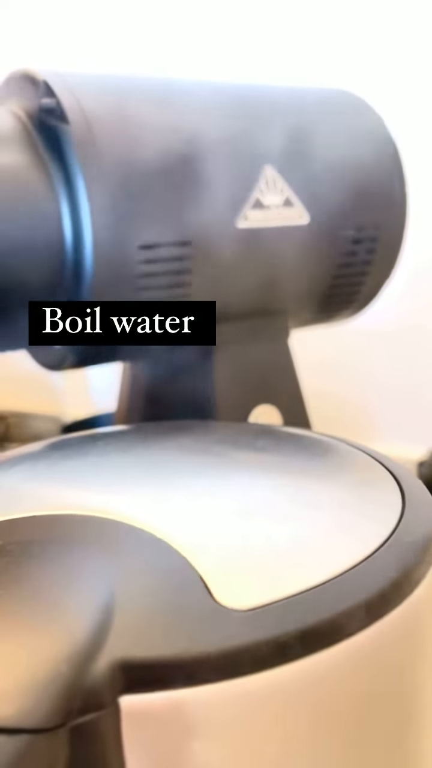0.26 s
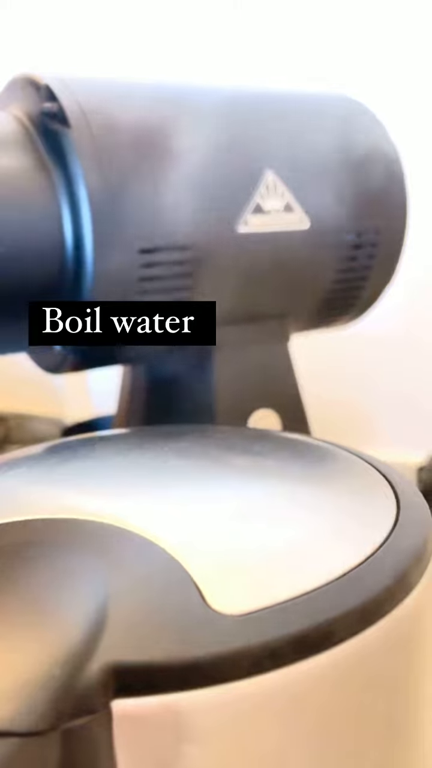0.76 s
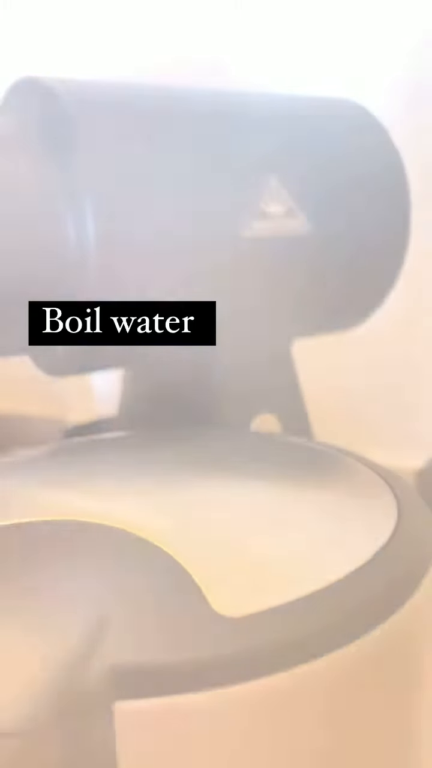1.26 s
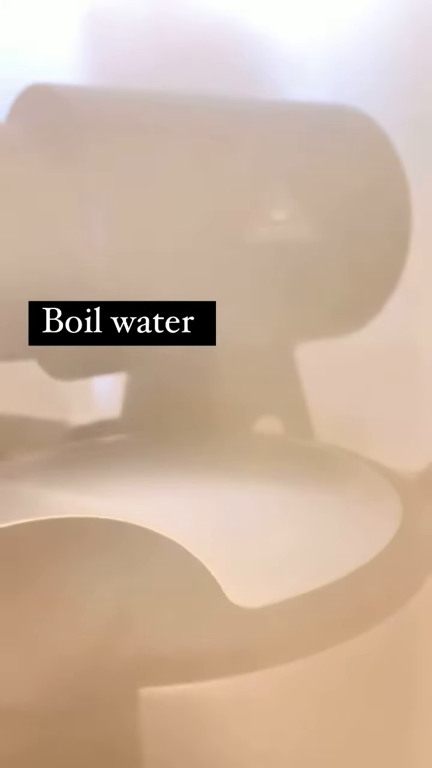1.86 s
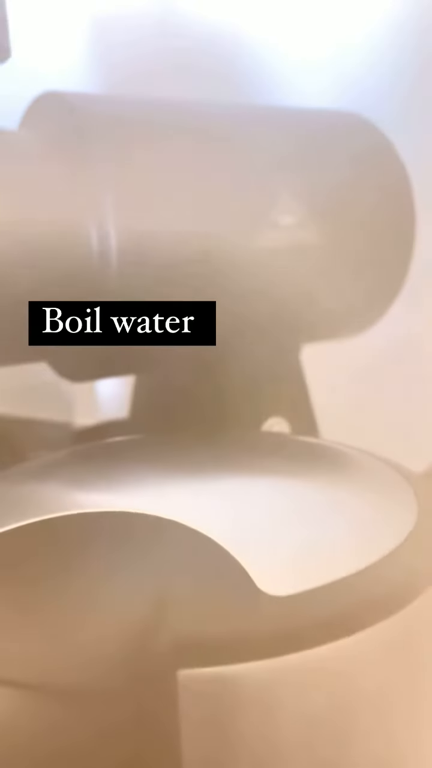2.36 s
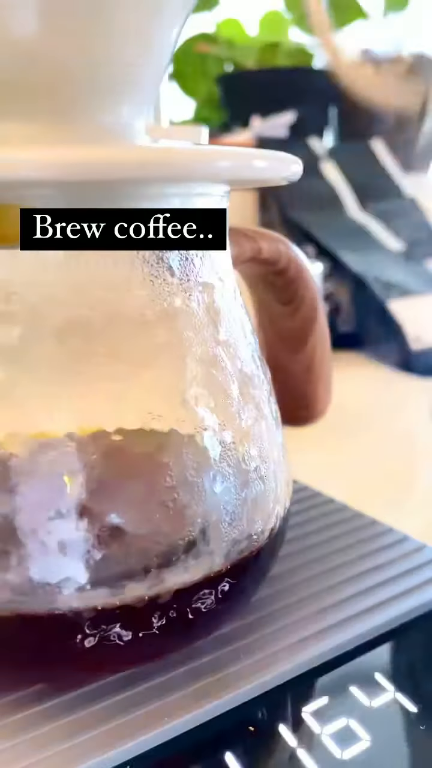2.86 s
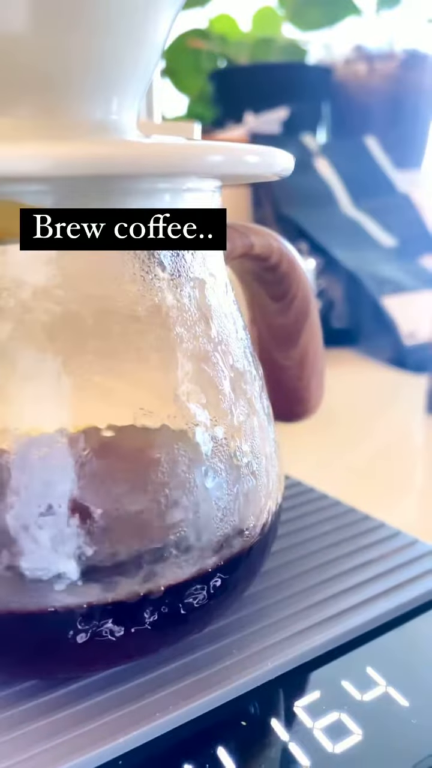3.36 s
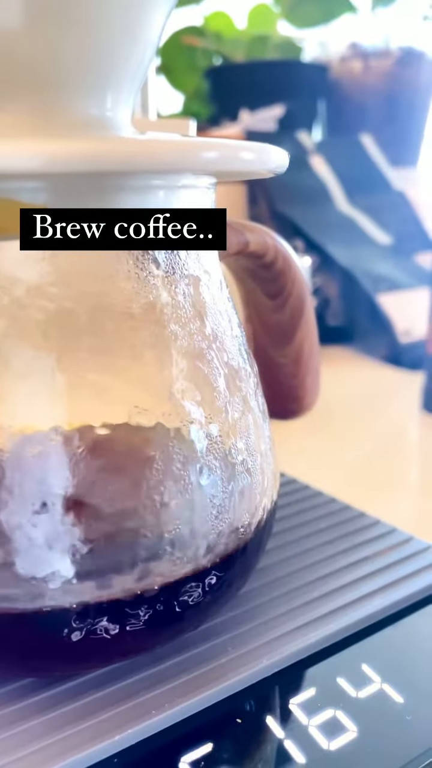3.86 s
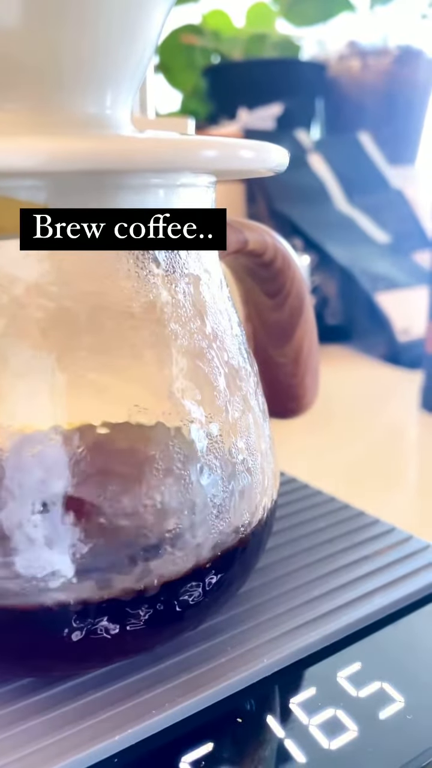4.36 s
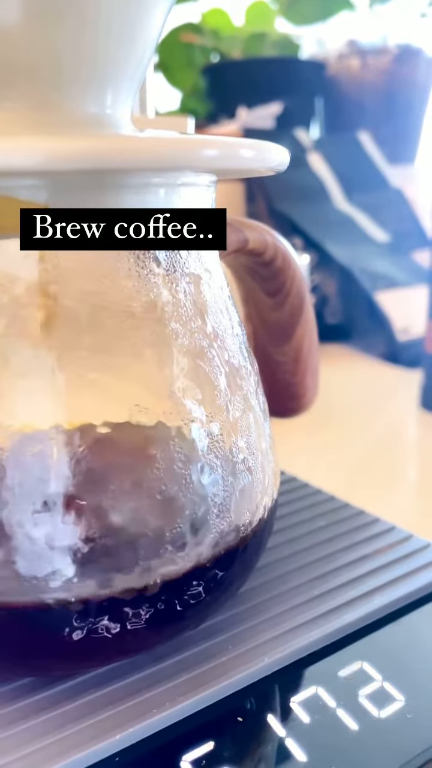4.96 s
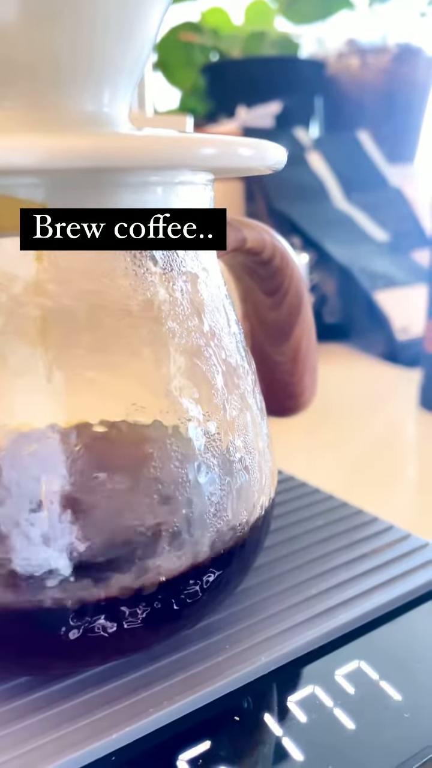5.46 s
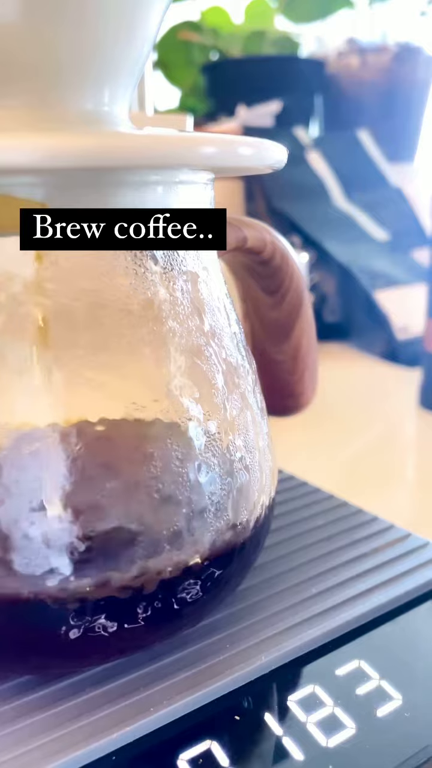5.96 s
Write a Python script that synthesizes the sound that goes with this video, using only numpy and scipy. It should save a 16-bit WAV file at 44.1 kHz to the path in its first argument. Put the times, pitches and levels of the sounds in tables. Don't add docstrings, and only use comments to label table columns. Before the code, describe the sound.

Loud bubbling rumble of boiling water stops dead at about three seconds; soft ventilation hum, faint rustles and delicate drops on glass follow.

```python
import sys
import numpy as np
from scipy import signal
from scipy.fft import rfft, irfft
from scipy.io import wavfile
from scipy.ndimage import uniform_filter1d

SR = 44100
rng = np.random.default_rng(int(sys.argv[2]) if len(sys.argv) > 2 else 0)


def amplitude_ratio(level_db):
    exponent = np.asarray(level_db, float) / 20
    return 10 ** exponent


def int16_out(signal):
    q = np.round(np.clip(np.atleast_2d(signal).T, -1, 1) * 32767)
    wavfile.write(sys.argv[1], SR, q.astype(np.int16))


N = 273420
T = np.arange(N) / SR
HZ = np.fft.rfftfreq(N, 1 / SR)

# [from_s, to_s, edge_s]
GAPS = [
    (2.8776, 2.92555, .00004),
    (3.90207, 3.92683, .00009),
]
# [start_s, peak_db, pitch_hz]
SPITS = [(0.0416, -36.5, 5600), (0.168, -39.5, 5420), (0.188, -33, 5360), (0.2403, -32.5, 3700),
         (0.284, -38, 4320), (0.3062, -53, 4640), (0.3336, -33.5, 3700), (0.3923, -43.5, 3740),
         (0.409, -43.5, 5350), (0.4262, -33, 5500), (0.4804, -46, 3700), (0.5205, -30, 5200),
         (0.6233, -47.5, 4840), (0.6583, -44, 4700), (0.704, -48.5, 3780), (0.7303, -39, 5000),
         (0.7721, -35, 4360), (0.794, -42.5, 4800), (0.815, -42, 4680), (0.837, -39.5, 3650),
         (0.893, -37.5, 3700), (0.9408, -37, 4520), (0.991, -35, 4120), (1.0614, -42.5, 3230),
         (1.0597, -40.5, 4510), (1.1346, -34.5, 3580), (1.1807, -39.5, 4600), (1.2092, -45, 4550),
         (1.285, -38.5, 4080), (1.376, -38, 4640), (1.498, -33.5, 4760), (1.5525, -34, 3780),
         (1.57, -35, 5060), (1.6195, -45.5, 5330), (1.6496, -36, 4860), (1.674, -47, 3660),
         (1.7102, -37.5, 4400), (1.7522, -37.5, 5260), (1.8, -35, 4500), (1.878, -33, 5040),
         (1.924, -33.5, 5360), (1.9547, -34.5, 5150), (2.0135, -42.5, 5210), (2.049, -39, 3540),
         (2.0838, -34, 5350), (2.136, -38, 4470), (2.157, -47, 4600), (2.1718, -34, 4700),
         (2.279, -37, 5130), (2.301, -37.5, 5100), (2.3577, -42.5, 5170), (2.384, -48, 4080),
         (2.595, -37.5, 3150), (2.633, -37.5, 3270), (2.6586, -38, 3730), (2.6958, -29.5, 3650),
         (2.7638, -33.5, 3320), (2.869, -28, 4940)]


def boil():
    deep, drum, hiss = vigour()
    surge = bursts(per_s=90, spread_db=1.5, decay_s=.005, steady=1.6)
    steady = roar(deep, drum, surge) + fizz(hiss, surge)
    growth_db = 3 * np.clip((T - 2.5) / 0.18, 0, 1)
    light = amplitude_ratio(-0.93 + growth_db) * hiss * bubbles(per_s=260, lo_hz=872, hi_hz=3060, cycles=12.7)
    light = light + lid_bursts()
    for at, db, hz in SPITS:
        add(light, at, amplitude_ratio(db - 0.5) * ping(hz, 0.0047, 0.0004))
    return steady + scattered(light, t60=0.052, wet_db=-.8) + scattered(heavy_water(), t60=.03, wet_db=-8)


def vigour():
    # [time_s, vigour_db]
    course = [
        (0.0, -27.5),
        (0.03, -33.5),
        (0.1, -30),
        (1.55, -28.5),
        (1.66, -33.5),
        (1.74, -29),
        (2.69, -29),
        (2.709, -29.5),
        (2.87, -31.5),
    ]
    s, db = np.transpose(course)
    db = np.interp(T, s, db - db.mean())
    mean_db, db_per_db = np.c_[[-35.5, -35.5, -52]], [1.7, 0.73, 0.082]
    slosh_db = np.c_[[-2.1, 2.07, -0.8]] * waver(count=3, per_s=33)
    return amplitude_ratio(np.outer(db_per_db, db) + mean_db + slosh_db)


def roar(deep, drum, surge):
    # [mode_hz, width_hz, level_db]
    body_modes = [(47, 15, -10), (96.3, 15.6, 0.5), (137, 16.5, -3.5), (182.1, 19.6, -3),
                  (262.7, 19.6, 1.5), (335.7, 66.2, -4.5), (377.3, 50.1, -2.5), (515.3, 130, -11),
                  (494, 107, -21), (705, 13.2, -16.5), (980, 150, -57), (1480, 31, -30.5),
                  (1970, 74, -35.5)]
    body = modes(body_modes)
    drive = surge ** .5 * noise()
    low = np.clip((230 - HZ) / 30, 0, 1)
    return deep * colour(drive, body * low) + drum * colour(drive, body * (1 - low))


def fizz(hiss, surge):
    # [freq_hz, density_db_per_hz]
    spectrum = [(200, -21), (500, -8), (1000, 11), (1300, -10), (2000, -1.5), (2500, 0), (3000, -3),
                (4500, -1.5), (6000, -4), (8000, -8), (10000, -11.5), (12000, -24), (13000, -35),
                (14000, -41.5), (15600, -32)]
    crackle = bursts(per_s=89, spread_db=0.0, decay_s=0.0009, steady=2.07)
    start_s, peak_db, _ = np.transpose(SPITS)
    lift = np.zeros(N)
    lift[np.round(SR * start_s).astype(int)] = amplitude_ratio(2 * (peak_db + 52))
    lift = signal.lfilter([1], [1, -np.exp(-1 / (0.0032 * SR))], lift)
    size = np.sqrt((surge ** 1.55 * crackle) ** 2 + lift)
    return amplitude_ratio(3.5) * hiss * colour(size * noise(), amplitude_ratio(read(spectrum, HZ)))


def heavy_water():
    # [start_s, peak_db, pitch_hz]
    thuds = [(0.023, -21, 213), (0.08, -21, 275), (0.12, -26, 388), (0.156, -24, 269), (0.189, -20, 369),
             (0.233, -22, 310), (0.259, -21, 269), (0.342, -24, 307), (0.397, -23, 277), (0.434, -23, 299),
             (0.492, -20, 272), (0.587, -16, 269), (0.646, -23, 272), (0.691, -22, 307), (0.722, -22, 277),
             (0.782, -24, 272), (0.827, -24, 285), (0.847, -18, 253), (0.903, -21, 277), (1.004, -22, 350),
             (1.044, -23, 256), (1.151, -19, 253), (1.284, -24, 326), (1.337, -21, 256), (1.387, -23, 240),
             (1.43, -23, 277), (1.49, -24, 280), (1.512, -22, 339), (1.541, -22, 283), (1.645, -24, 283),
             (1.672, -28, 242), (1.722, -22, 256), (1.811, -22, 312), (1.847, -19, 253), (1.897, -24, 258),
             (1.928, -22, 310), (1.979, -22, 288), (2.045, -19, 293), (2.078, -20, 269), (2.153, -24, 299),
             (2.211, -18, 253), (2.258, -21, 283), (2.284, -27, 283), (2.315, -26, 250), (2.346, -22, 253),
             (2.379, -22, 336), (2.446, -23, 361), (2.501, -22, 291), (2.545, -20, 250), (2.611, -23, 256),
             (2.635, -23, 283), (2.692, -21, 371), (2.748, -19, 261), (2.789, -20, 280), (2.828, -27, 296),
             (2.855, -27, 310)]
    # [start_s, peak_db, pitch_hz]
    heaves = [(0.023, -23, 189.6), (0.139, -24, 97), (0.3, -20, 109), (0.373, -29, 80),
              (0.41, -22.5, 142.5), (0.638, -30, 93.7), (0.686, -38, 107), (0.799, -34, 87),
              (0.855, -28, 78.6), (0.968, -24, 101), (1.147, -28, 132), (1.242, -22, 186.2),
              (1.291, -25, 180), (1.423, -32, 102.4), (1.462, -19, 94.4), (1.712, -19, 96.3),
              (1.89, -21, 105.6), (2.008, -27, 161), (2.08, -22, 100), (2.205, -28, 103.5), (2.32, -28, 95),
              (2.427, -33.5, 105), (2.511, -30, 98), (2.645, -27, 90), (2.697, -21, 98),
              (2.786, -26.5, 150.3)]
    # [start_s, peak_db, pitch_hz]
    slaps = [(0.026, -26, 136), (0.143, -42, 190), (0.413, -36, 137), (0.56, -25.5, 188), (0.7, -23, 182),
             (0.8, -38, 188), (0.856, -31, 179), (0.964, -26, 177), (1.051, -26.5, 174), (1.153, -43, 141),
             (1.381, -28, 178.3), (1.427, -27, 149), (1.494, -28, 180), (1.686, -27, 212),
             (1.776, -25, 183), (1.837, -19.5, 191), (1.896, -36, 130), (1.94, -27, 149), (2.016, -18, 153),
             (2.072, -30, 131), (2.351, -31, 173), (2.547, -31, 141), (2.641, -25, 175), (2.79, -26.5, 146)]
    out = np.zeros(N)
    for at, db, hz in thuds:
        upper_partial = .4 * ping(1.42 * hz, .075, .002)
        add(out, at, amplitude_ratio(db + 3.5) * (ping(hz, .075, .004, glide=.08) + upper_partial))
    for at, db, hz in heaves:
        add(out, at, amplitude_ratio(db + 6) * ping(hz, 0.15, 0.012))
    for at, db, hz in slaps:
        add(out, at, amplitude_ratio(db + 4.5) * ping(hz, .11, 0.0055))
    return out


def lid_bursts():
    # [start_s, peak_db, pitch_hz]
    pops = [(0.168, -38, 1450), (0.2475, -37.5, 1904), (0.3803, -42, 1450), (0.423, -32, 1460),
            (0.5213, -35, 1460), (0.647, -51, 1820), (0.742, -37, 1560), (0.8186, -36, 1900),
            (0.871, -35, 1480), (0.9084, -29, 1940), (0.9714, -39, 1440), (1.011, -39, 1980),
            (1.029, -43, 2380), (1.069, -27.5, 1970), (1.1276, -37, 1870), (1.287, -39, 1480),
            (1.3255, -32, 1750), (1.334, -31, 2090), (1.4077, -32.5, 2290), (1.4157, -31.5, 2450),
            (1.4495, -42, 1460), (1.487, -36.5, 1480), (1.594, -35, 1920), (1.6, -34, 2260),
            (1.7549, -60, 1370), (1.775, -37.5, 1430), (1.886, -42, 1910), (1.923, -44, 1480),
            (1.99, -37, 1450), (2.1839, -61, 1600), (2.2653, -36, 1480), (2.361, -44, 1410),
            (2.443, -35, 2080), (2.46, -40, 1780), (2.518, -35, 1700), (2.573, -38, 2000),
            (2.596, -34, 2570), (2.6074, -37, 2430), (2.635, -38, 1480), (2.654, -40, 1260),
            (2.671, -33, 2440), (2.6878, -30, 1930), (2.69, -32, 2750), (2.702, -35, 1500),
            (2.7697, -23.5, 1970)]
    # [delay_s, level_db, pitch_factor]
    echoes = [(.007, -14.5, 1.04), (.013, -17, 0.85), (.021, -16, 1.08), (.03, -12, .97)]
    t60_s, lid_width_hz = 0.009, 150
    out = np.zeros(N)
    for at, db, hz in pops:
        add(out, at, amplitude_ratio(db + 5.0) * ping(hz, t60_s, 0.00066, glide=0.029))
        for note_hz in (1475, 1970):
            nearness = np.exp(-((hz - note_hz) / lid_width_hz) ** 2)
            add(out, at, amplitude_ratio(db - 13) * nearness * ping(note_hz, 0.032, 0.0025))
        for delay, echo_db, shift in echoes:
            add(out, at + delay, amplitude_ratio(db + 7.0 + echo_db) * ping(shift * hz, 1.54 * t60_s, 0.0023))
    return out


def bubbles(per_s, lo_hz, hi_hz, cycles):
    size = amplitude_ratio(3.1 * np.minimum(rng.exponential(1, N), 4)) * (rng.random(N) < per_s / SR)
    kind = rng.integers(0, 16, N)
    out = np.zeros(N)
    for k, hz in enumerate(np.geomspace(lo_hz, hi_hz, 16)):
        one = ping(hz, cycles / hz, 0.00014, glide=0.023)
        out += signal.oaconvolve(size * (kind == k), one)[:N]
    return evened(out)


def clinks():
    # [start_s, low_ring_db, middle_ring_db, high_ring_db, ring_length_factor]
    drops = [(4.4555, -56, -92, -97, 0.29), (4.544, -81, -87, -86, 1.2),
             (4.5853, -46.5, -65.5, -83.5, 0.99), (4.7872, -75, -77, -98, 0.88),
             (5.2377, -86, -79, -87.5, 0.98), (5.3639, -82, -79, -89, 0.96), (5.396, -61, -45, -72, 0.55),
             (5.4795, -77, -66, -94, 0.86), (5.609, -77, -77, -97, 0.97), (5.6598, -74, -72, -96, 0.95),
             (5.7535, -82, -87, -89, .8), (5.909, -72, -56, -66, 0.7), (6.0893, -73, -64, -75, 1.1),
             (6.118, -58.5, -43, -73.5, 0.87)]
    # [mode_hz, t60_s]
    jug = [(2692, 0.04), (2800, .035), (3034, 0.19), (4190, .014), (4930, 0.12), (5050, 0.016),
           (6500, .012), (10950, 0.02)]
    out, t = np.zeros(N), np.arange(4000) / SR
    f = np.fft.rfftfreq(len(t), 1 / SR) + 1
    spray_band = np.exp(-(np.log2(f / 9450) / .55) ** 2)
    sprays = rng.standard_normal((len(drops), len(t)))
    for (at, low_db, mid_db, high_db, ring), spray in zip(drops, sprays):
        levels_db = (low_db, low_db + 3, low_db + 8, mid_db - 5, mid_db - 11, mid_db + 11, mid_db - 6,
                     high_db + 6)
        glass = np.zeros(len(t))
        for db, (hz, t60) in zip(levels_db, jug):
            add(glass, 0, amplitude_ratio(db) * ping(hz, ring * t60, .0007))
        choke = np.sqrt(1 + (t / (ring * 0.05)) ** 12)
        add(out, at, glass / choke)
        add(out, at, amplitude_ratio(mid_db) * ping(5200, .004, .0002))
        add(out, at, amplitude_ratio(high_db + 7.5 - 60 * t / .035) * evened(irfft(rfft(spray) * spray_band)))
    return out


def rustles():
    # [start_s, length_s, level_db, centre_hz]
    brushes = [(2.926, 0.06, -76, 11000), (2.93, .06, -74.5, 5500), (3.232, 0.17, -73.5, 4570),
               (3.687, 0.24, -76, 5000), (4.02, 0.055, -72, 7400), (4.564, 0.13, -84, 5200),
               (4.84, 0.034, -76, 1900), (4.922, 0.098, -74, 5570), (5.402, 0.17, -79.5, 5500),
               (5.911, 0.015, -68, 6350), (6.092, 0.47, -67.5, 5650), (6.096, 0.52, -58, 2300)]
    # [start_s, length_s, level_db, centre_hz]
    gurgles = [(3.22, 0.97, -69, 2400), (3.696, 0.18, -81, 2600), (4.6, .16, -84, 5470),
               (5.4, .14, -81, 5000)]
    out = np.zeros(N)
    rows = [(*row, 0.81) for row in brushes] + [(*row, 0.24) for row in gurgles]
    t = np.arange(48000) / SR
    f = np.fft.rfftfreq(len(t), 1 / SR) + 1
    for (at, length, db, hz, octaves), grain in zip(rows, rng.standard_normal((len(rows), len(t)))):
        band = evened(irfft(rfft(grain) * np.exp(-(np.log2(f / hz) / octaves) ** 2)))
        rise = np.minimum(t / 0.0071, 1)
        fade = np.cos(np.minimum(t / length, 1) * np.pi / 2) ** 1.1
        add(out, at, amplitude_ratio(db) * band * rise * fade)
    return out


def ticks():
    # [start_s, peak_db, pitch_hz]
    tick_list = [(3.9338, -63, 9500), (3.9793, -42, 1300), (3.9793, -44, 2800), (3.9793, -54, 5200),
                 (5.9105, -60, 10500), (5.3962, -62, 10500), (3.9793, -70, 9500), (4.029, -67, 10500),
                 (4.0305, -66, 5500), (4.04, -69, 10000), (4.041, -67, 5500), (4.052, -66, 5300),
                 (4.329, -67, 5500), (4.9235, -68, 5800), (4.931, -66, 5500), (4.073, -47, 950),
                 (4.86, -47, 1000)]
    out = np.zeros(N)
    for at, db, hz in tick_list:
        add(out, at, amplitude_ratio(db) * ping(hz, 6 / hz, .00003))
    return out


def kitchen():
    return ventilation() + trickle() + scattered(rustles() + clinks(), t60=.06, wet_db=-14)


def trickle():
    # [freq_hz, density_db_per_hz]
    spectrum = [(1500, -0.5), (2500, 5), (4000, -1.5), (4600, -9), (5200, -5), (6200, -14.5), (7300, -11.5),
                (7700, -11.5), (8200, -11.5), (9500, -35), (12500, -42.5), (13500, -40), (15600, -22)]
    # [time_s, level_db]
    flow = [(2.93, -57), (3.02, -76), (3.28, -72), (3.6, -69), (3.88, -68), (4.0, -67.5), (4.2, -76.5),
            (4.9, -75.5), (5.15, -72.5), (5.7, -75.5), (6.0, -71.5)]
    puffs = bursts(per_s=210, spread_db=2.5, decay_s=.004, steady=1.4) * noise()
    return amplitude_ratio(np.interp(T, *np.transpose(flow))) * colour(puffs, amplitude_ratio(read(spectrum, HZ)))


def ventilation():
    # [freq_hz, density_db_per_hz]
    spectrum = [(12, -42), (20, -33.5), (38, -3), (70, -9.5), (87, -0.5), (170, -4), (215, -4.5),
                (298, -11), (362, -9.5), (386, -15.5), (449, -14.5), (608, -16.5), (999, -20), (1570, -32),
                (3500, -48.5), (4550, -64.5), (7700, -120)]
    # [mode_hz, width_hz, lift_db]
    room_modes = [(56.7, 19, 5.5), (114.2, 13, 3.5), (120, 8.8, 1), (180.7, 21.6, 5.5), (219.7, 11, 4),
                  (269, 5.6, 8.5), (357, 24, 1.5)]
    lumps_db = sum(db * np.exp(-((HZ - hz) / width) ** 2) for hz, width, db in room_modes)
    gusts = amplitude_ratio(1.5 * waver(count=1, per_s=14))
    upper = np.clip((HZ - 350) / 200, 0, 1)
    air = rfft(colour(noise(), amplitude_ratio(read(spectrum, HZ) + lumps_db)))
    rumble = irfft(air * (1 - upper), N) + gusts * irfft(air * upper, N)
    return amplitude_ratio(-39 - .5 * (T - GAPS[0][1])) * rumble


def microphone_hiss():
    # [freq_hz, density_db_per_hz]
    spectrum = [(3000, -11), (6000, -2), (9500, 3.5), (12500, 0), (13500, -3), (15700, -12)]
    return amplitude_ratio(-92.5) * colour(noise(), amplitude_ratio(read(spectrum, HZ)) * (HZ > 3000))


def ports(pair, column, tilt_db):
    # [freq_hz, likeness_at_kettle, likeness_in_kitchen, left_right_at_kettle_db]
    port_table = [(0, 1, 0.9, 6), (100, 1, 0.88, -1.5), (200, 1, 1, 2.5), (392, 0.94, 0.69, -5),
                  (665, 0.12, 0.18, -6.5), (910, 0.083, 0.032, 1.5), (1400, 0.4, 0.12, 2),
                  (2000, 0.56, 0.19, 1), (2500, 0.088, 0.08, 2), (3740, 0.56, 0.1, -1.5),
                  (4120, 0.11, 0.13, -4), (5000, 0.74, 0.34, 0.5), (6840, 1, 0.59, -1),
                  (9300, 0.63, 0.37, -1), (12500, 0.23, 0.25, 7.5), (15700, .8, .8, 1)]
    # [freq_hz, left_lead_rad]
    lead_table = [(0, 0), (200, -.03), (750, -1.1), (1500, -.4), (2000, .3), (3000, .8), (4800, -.4),
                  (7600, 3.14), (11200, 6.28), (14200, 9.42), (16000, 11.3)]
    f, *columns = np.transpose(port_table)
    apart = np.clip((HZ - 110) / 120, .02, 1)
    same = 1 - apart * np.clip(1 - np.interp(HZ, f, columns[column]), 0, 1)
    lead = np.interp(HZ, *np.transpose(lead_table))
    if column == 0:
        tilt_db = apart * np.interp(HZ, f, columns[2])
    shared, other = rfft(pair) * np.sqrt([(1 + same) / 2, (1 - same) / 2])
    left = (shared + other) * amplitude_ratio(tilt_db / 2) * np.exp(.5j * lead)
    right = (shared - other) * amplitude_ratio(-tilt_db / 2) * np.exp(-.5j * lead)
    return irfft(np.array([left, right]), N)


def scattered(x, t60, wet_db):
    t = np.arange(round(SR * t60)) / SR
    tails = rng.standard_normal((len(t), 2)).T * amplitude_ratio(-60 * t / t60) * (t > .002)
    wet = signal.fftconvolve(x[None], tails / np.linalg.norm(tails[0]), axes=1)[:, :N]
    return amplitude_ratio(wet_db) * wet + np.array([x, 0.092 * x])


def ping(hz, t60, rise_s, glide=0.):
    t = np.arange(round(SR * t60)) / SR
    tone = np.sin(2 * np.pi * hz * t * (1 + glide * t / t60))
    return tone * amplitude_ratio(-60 * t / t60) * (1 - np.exp(-t / rise_s))


def bursts(per_s, spread_db, decay_s, steady):
    size = amplitude_ratio(spread_db * np.minimum(rng.exponential(1, N), 4)) * (rng.random(N) < per_s / SR)
    puff = signal.lfilter([1], [1, -np.exp(-1 / (decay_s * SR))], size ** 2)
    return np.sqrt(steady + puff / puff.mean())


def modes(table):
    out = 0
    for k, (hz, width, db) in enumerate(table):
        damping = 1j * HZ * width
        out = out + (-1) ** k * amplitude_ratio(db) * damping / (hz ** 2 - HZ ** 2 + damping)
    return out


def noise():
    return rng.standard_normal((N, 2)).T


def waver(count, per_s):
    slow = 1 / (1 + (HZ / per_s) ** 4) * (HZ > 1)
    return np.array([colour(x, slow) for x in rng.standard_normal((count, N))])


def colour(x, gain):
    return evened(irfft(rfft(x) * gain, N))


def evened(x):
    return x / np.sqrt(np.mean(x ** 2) + 1e-30)


def read(points, hz):
    f, value = np.transpose(points)
    return np.interp(np.log(hz + 1), np.log(f + 1), value, right=-90)


def add(mix, s, sound):
    part = mix[round(s * SR):][:len(sound)]
    part += sound[:len(part)]


def scene():
    # [freq_hz, left_right_db]
    lean = [(60, 0.5), (130, 0.5), (270, 2.0), (590, 4), (1260, 2), (2680, 0), (5740, 1.5), (12300, -1.5)]
    # [time_s, peak_db, width_s]
    swings = [
        (2.8776, -46, .0004),
        (2.92555, -31, .002),
        (3.9016, -35, .0012),
        (3.9269, -42, .00012),
    ]
    lean_db = np.interp(HZ, *np.transpose(lean))
    quiet = ports(kitchen() + microphone_hiss(), column=1, tilt_db=lean_db) + ticks()
    out = np.where(T < GAPS[0][0], ports(boil(), column=0, tilt_db=0), quiet)
    for s, db, width in swings:
        bell = np.exp(-((T - s) / width) ** 2)
        duck = 1 - np.exp(-((T - s) / max(width, .0006)) ** 2)
        out = out * duck + amplitude_ratio(db) * bell
    return out


def band_limit(x):
    return signal.sosfilt(signal.butter(12, 15750, fs=SR, output="sos"), x)


def record(dry):
    # [mid_0_or_side_1, from_hz, to_hz, share_of_frames]
    emptied = [(0, 6950, 8300, 1), (0, 8300, 8900, .5), (0, 11700, 12300, .2), (0, 12300, 13100, .7),
               (0, 13100, 15250, 1), (0, 15250, 15750, .85), (1, 5150, 5500, .15), (1, 9700, 10300, .25),
               (1, 10300, 11800, 1), (1, 11800, 12300, .75), (1, 12300, 12700, .5), (1, 12700, 13100, .45),
               (1, 13100, 13600, .4), (1, 13600, 14100, .4), (1, 14100, 14600, .45), (1, 14600, 15200, .5),
               (1, 15200, 15750, .55)]
    sharp_s = [.335, .87, 1.137, 2.172, 2.872, 2.926, 3.902, 3.927, 3.934, 3.979, 5.397, 5.481, 5.911]
    sounding = np.prod([np.clip(np.maximum(a - T, T - b) / edge + .5, 0, 1) for a, b, edge in GAPS], axis=0)
    turn = np.array([[1, 1], [1, -1]]) / np.sqrt(2)
    hz = np.fft.rfftfreq(2 * N, 1 / SR)
    spectra = rfft(turn @ (dry * sounding), 2 * N) * (hz < 15750)
    pair = irfft(spectra)[:, :N]
    kept = np.max([np.clip(2 - abs(T - s) / .006, 0, 1) for s in sharp_s], axis=0)
    frame = (np.arange(N) + 1024 - 276) // 1024
    chances = rng.random((len(emptied), frame[-1] + 1))
    for (side, lo, hi, share), luck in zip(emptied, chances):
        gone = uniform_filter1d((luck < share)[frame] * 1., size=256) * (1 - kept)
        band = irfft(spectra[side] * (hz >= lo) * (hz < hi))[:N]
        pair[side] -= gone * band
    return band_limit(np.where(sounding > 0, turn @ pair, 0))


dry = scene()
out = record(dry)
int16_out(out)
```